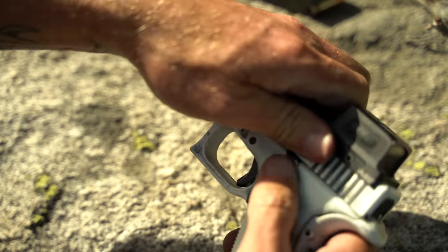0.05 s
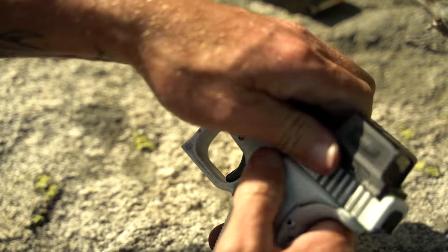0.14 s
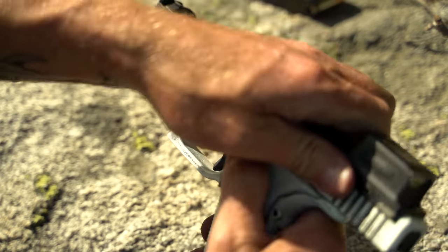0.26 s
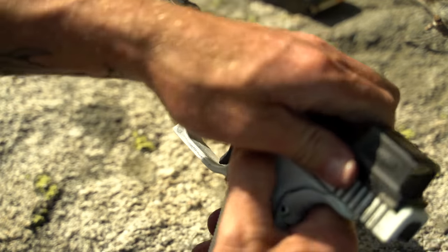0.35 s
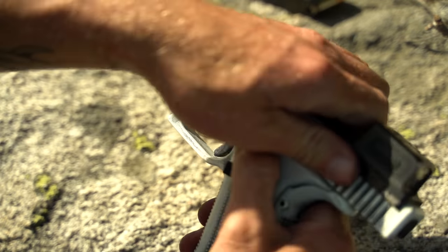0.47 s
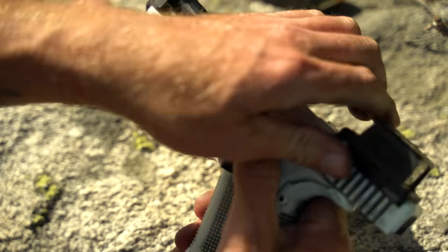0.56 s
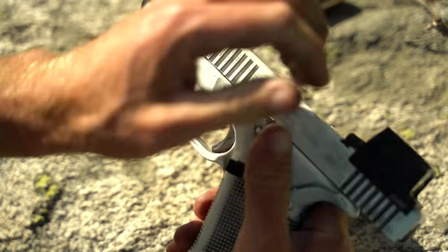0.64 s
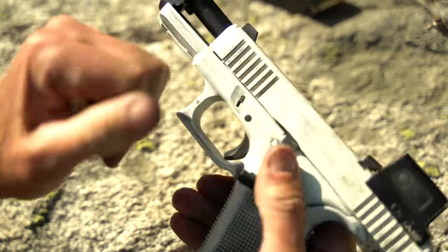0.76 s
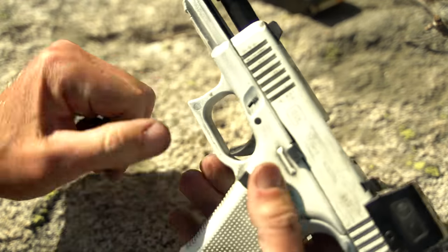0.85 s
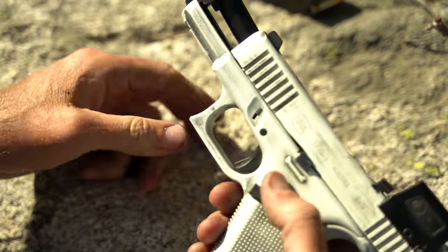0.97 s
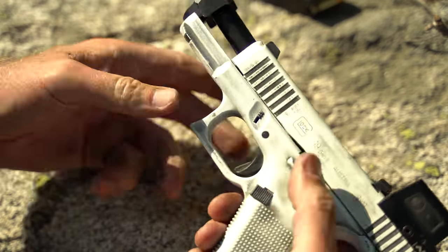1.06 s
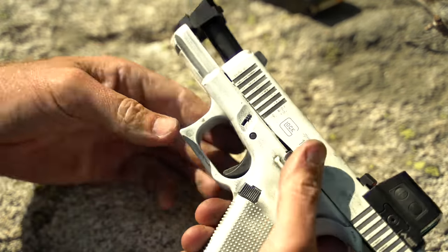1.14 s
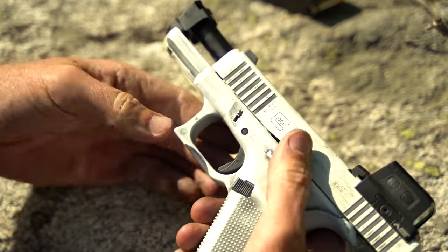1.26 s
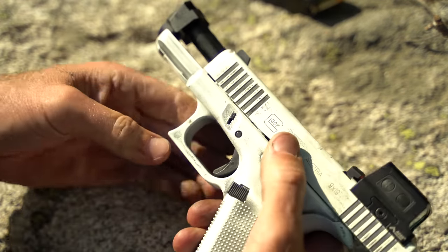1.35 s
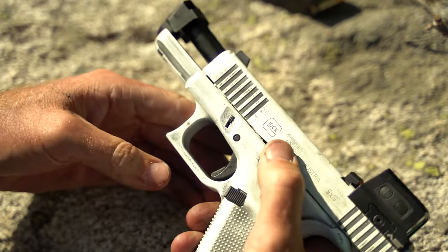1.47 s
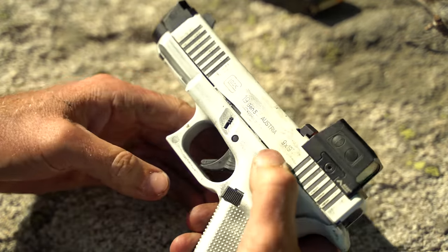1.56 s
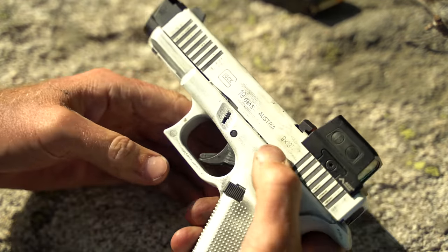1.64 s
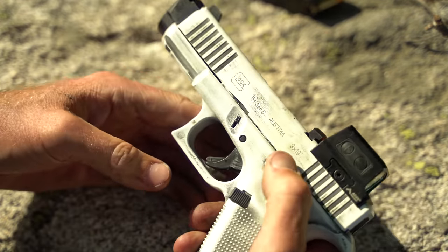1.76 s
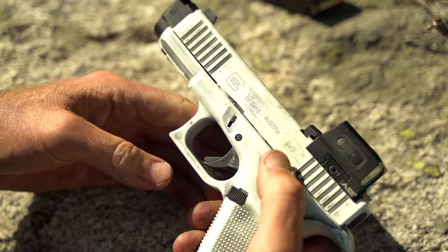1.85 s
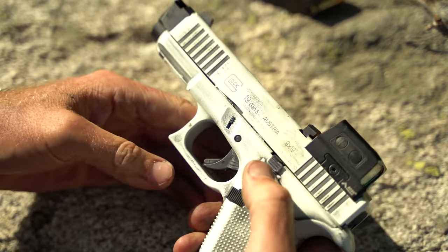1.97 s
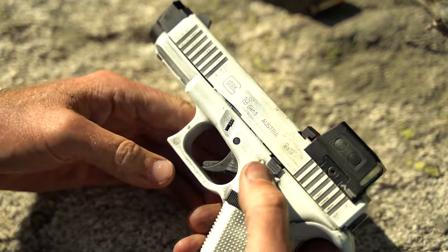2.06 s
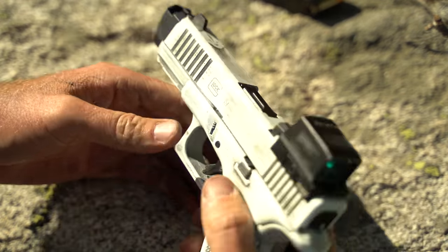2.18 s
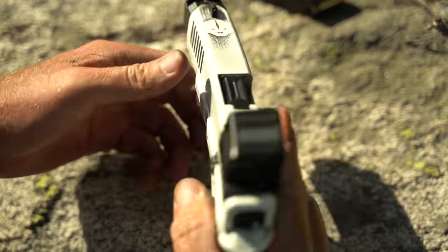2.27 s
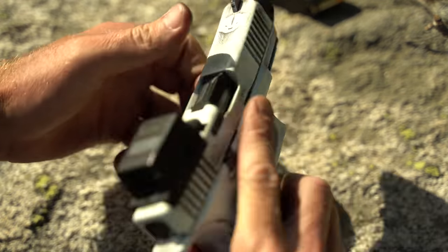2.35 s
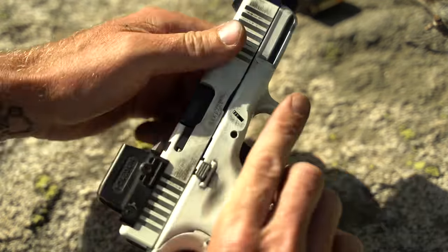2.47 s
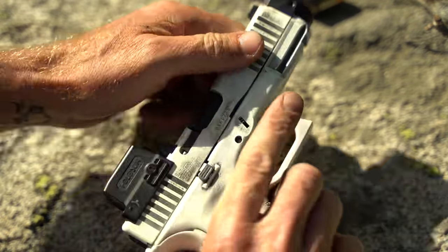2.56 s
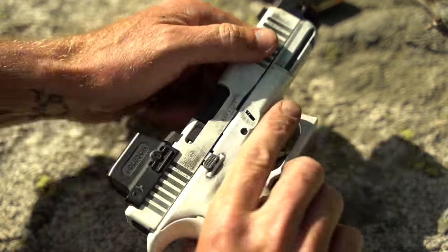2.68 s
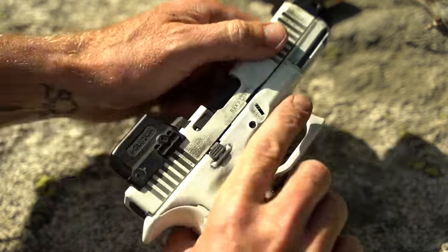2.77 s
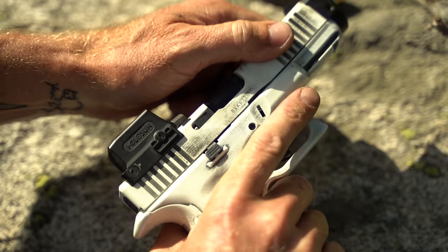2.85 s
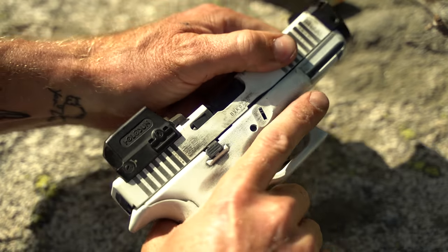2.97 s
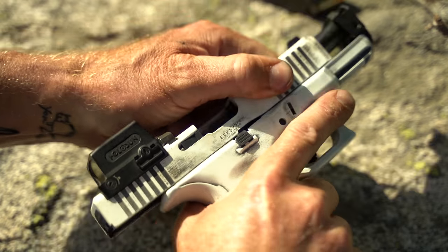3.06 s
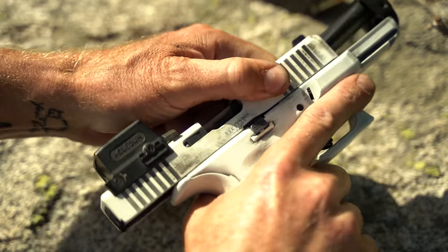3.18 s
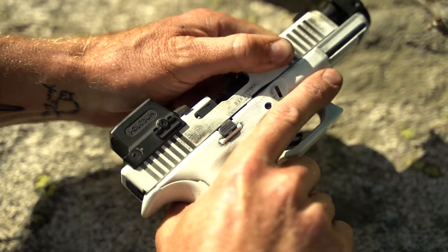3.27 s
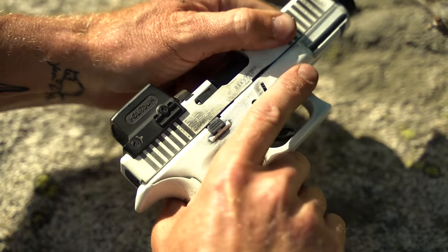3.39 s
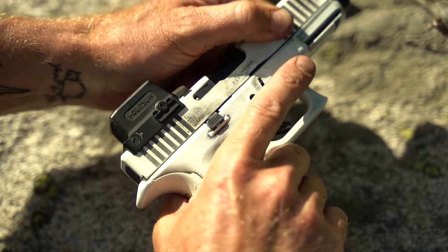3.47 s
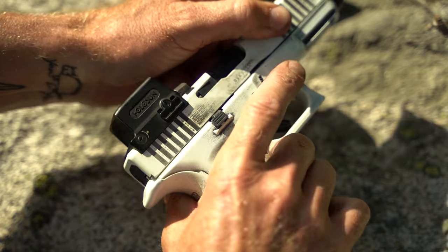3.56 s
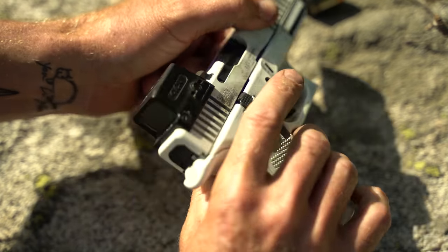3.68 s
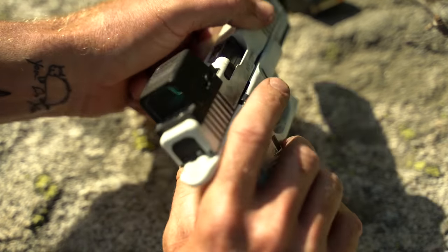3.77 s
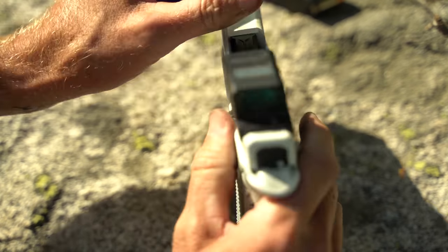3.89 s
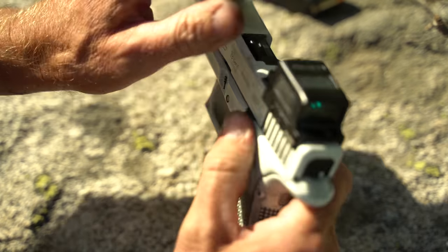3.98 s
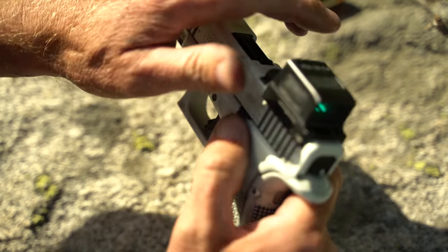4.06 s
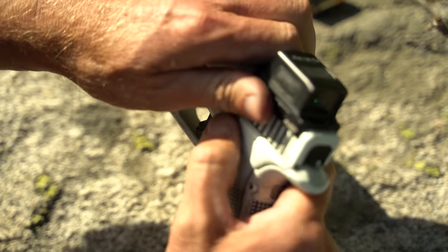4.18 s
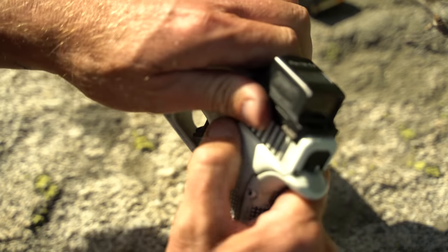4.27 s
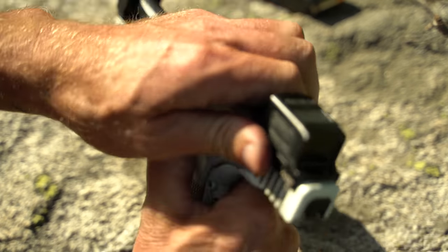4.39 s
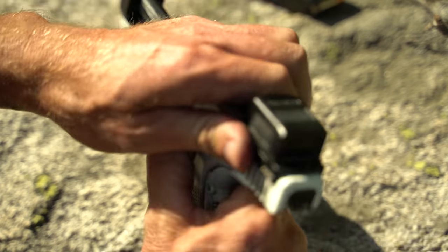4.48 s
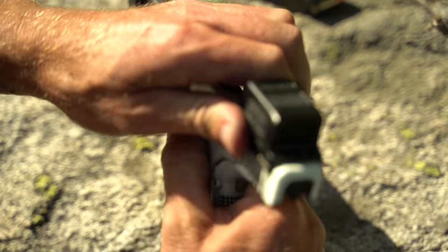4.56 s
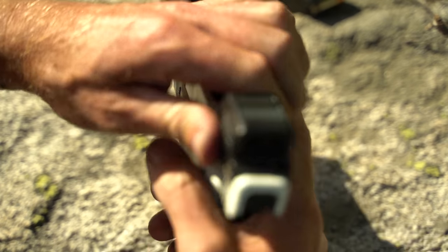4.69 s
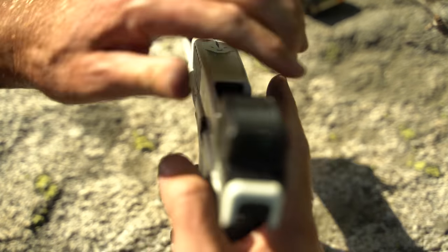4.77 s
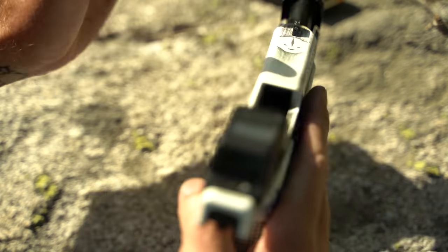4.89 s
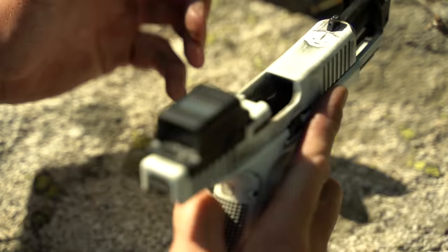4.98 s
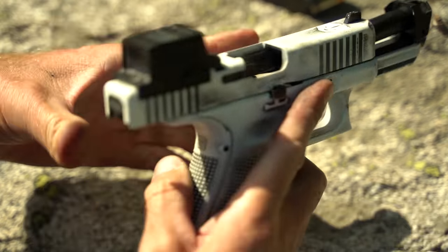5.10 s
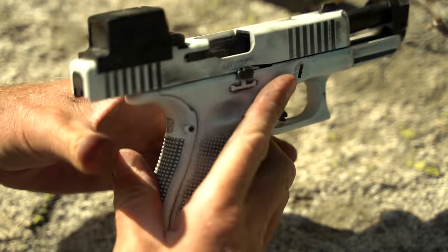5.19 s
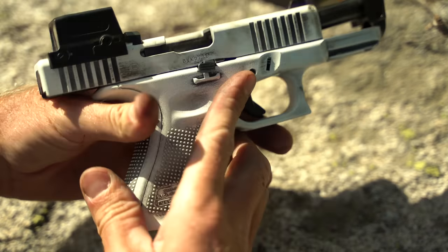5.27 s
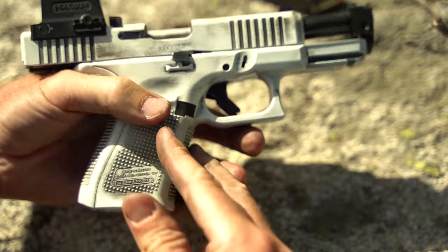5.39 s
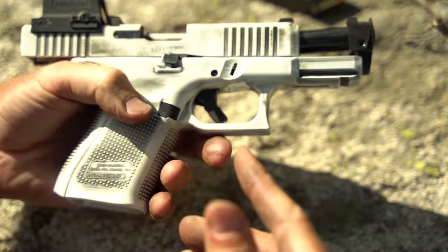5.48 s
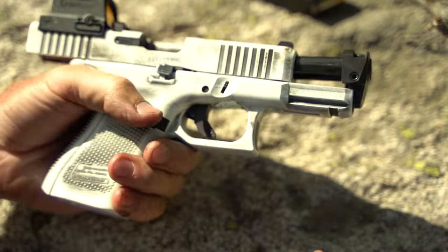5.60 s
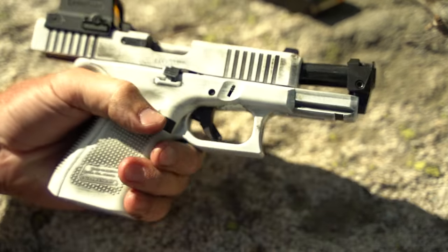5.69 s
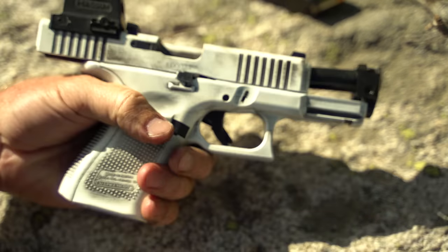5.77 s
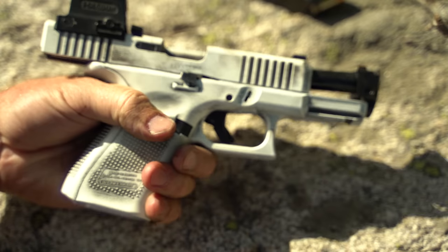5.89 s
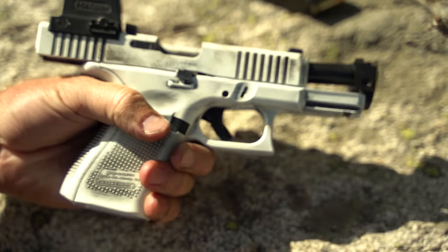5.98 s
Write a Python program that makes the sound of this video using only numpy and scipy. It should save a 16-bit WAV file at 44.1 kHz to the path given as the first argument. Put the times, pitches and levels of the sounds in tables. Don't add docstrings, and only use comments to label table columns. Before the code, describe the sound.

A pistol's steel slide is racked, slammed and locked back by hand outdoors, with gritty scrapes, sharp metallic clacks and small ticks between.

```python
import sys
import numpy as np
from scipy import signal
from scipy.fft import rfft, irfft, next_fast_len
from scipy.io import wavfile

SR = 44100
rng = np.random.default_rng(int(sys.argv[2]) if len(sys.argv) > 2 else 0)


def nominal_scale(level):
    x = np.asarray(level, float) / 20
    return 10 ** x


def put_to_file(sound):
    columns = np.atleast_2d(sound).T
    safe = np.clip(columns, -1, 1)
    whole_steps = np.round(safe * 32767)
    wavfile.write(sys.argv[1], SR, whole_steps.astype(np.int16))


N = 266364
LEFT_RIGHT = np.array([[1], [-1]])

# (frequency [Hz], level [dB], t60 [s])
FRAME_MODES = [(323, -16, 0.029), (417, -17, 0.013), (605, -0.5, .015), (710, 1, 0.022), (937, 0, 0.018),
               (1085, 4, 0.015)]
# (frequency [Hz], level [dB], t60 [s])
SLIDE_MODES = [(1320, 0.5, .018), (1620, -11, 0.0043), (1880, 2, .022), (2010, 0, 0.014), (2238, 2, 0.019),
               (2501, 0, .016), (2887, -1, .018), (3297, 3.5, .012)]
# (frequency [Hz], level [dB], t60 [s])
PART_MODES = [(4094, 5.5, 0.0065), (4800, -4.5, .008), (5310, -4, 0.01), (5830, -2.5, .011),
              (6730, 0, 0.0031), (7437, -2, 0.0064), (8750, -3, 0.0028), (9580, -5.5, 0.0094),
              (10900, -10, 0.0029), (13800, -14.5, .005), (14820, -19, .005)]
# (frequency [Hz], likeness [-1 to 1])
AIR_LIKENESS = [(60, .85), (250, .93), (700, .9), (1400, .5), (3000, -.1)]


def rms_one(x):
    return x / np.sqrt(np.mean(x ** 2) + 1e-20)


def in_time(rows):
    s, *columns = np.transpose(rows)
    return [np.interp(np.arange(N) / SR, s, c) for c in columns]


def at_hz(points, hz, order=1):
    return np.interp(np.log(hz), np.log(np.array(points)[:, 0]), np.array(points)[:, order])


def filtered(x, order, hz, kind):
    return signal.sosfilt(signal.butter(order, hz, kind, fs=SR, output="sos"), x)


def drift(rate_hz):
    r = np.exp(-80 * np.pi * rate_hz / SR)
    slow = signal.lfilter([1], [1, -2 * r, r * r], rng.standard_normal(N // 40 + 2002))[2000:]
    return np.interp(np.arange(N) / 40, np.arange(len(slow)), rms_one(slow))


def bands(spectrum, patchy_db, likeness, size=2):
    out, edges = 0, 22 * 2 ** np.arange(0, 10, .5)
    white = rng.standard_normal((size, 2, N))
    for k, (low, high) in enumerate(zip(edges, edges[1:])):
        hz = np.sqrt(low * high)
        if not spectrum[0][0] * .8 < hz < spectrum[-1][0]:
            continue
        mid, side = filtered(white[k % size], 2, [low, high], "band")
        alike = np.clip(at_hz(likeness, hz), -1, 1)
        gain = nominal_scale(at_hz(spectrum, hz) + patchy_db * drift(3))
        out = out + gain * (np.sqrt(1 + alike) * mid + np.sqrt(1 - alike) * side * LEFT_RIGHT)
    return rms_one(out)


def body(modes, crack_db, size=2048):
    t = np.arange(size) / SR
    rings = 0
    for k, (hz, db, t60) in enumerate(modes):
        rings = rings + nominal_scale(db - 60 * t / abs(t60)) * np.sin(2 * np.pi * hz * t) * (-1) ** k
    crack = filtered(t == 0, 2, [modes[0][0] * 0.86, min(modes[-1][0] * 0.93, 11000)], "band")
    return rms_one(rms_one(rings) + nominal_scale(crack_db) * rms_one(crack))


def near(modes, hz, fall_db, most_db, damping=1.0):
    return [(f, db - min(fall_db * np.log2(f / hz) ** 2, most_db), t60 / damping) for f, db, t60 in modes]


def ports(x, direction):
    size = next_fast_len(N + 4096)
    hz = np.maximum(np.fft.rfftfreq(size, 1 / SR), 1)
    gap = nominal_scale(at_hz(direction, hz, order=2) / 2) * np.exp(.5j * at_hz(direction, hz))
    return irfft(rfft(x, size) * [gap, 1 / gap], size)[:, :N]


def breeze():
    # (time [s], level [dB])
    gusts = [(0.0, -64), (0.27, -65), (2.24, -71.5), (3.11, -66.5), (3.25, -60.5), (3.62, -71), (4.16, -69),
             (4.56, -62.5), (5.26, -73.5), (6.04, -72)]
    return in_time(gusts)[0]


def drone():
    # (peak time [s], half length [s], rise above rest [dB])
    swells = [
        (2.45, .35, 7.5),
        (3.62, 0.37, 10),
        (5.72, 0.37, 13.5),
    ]
    centre_hz, width_hz, rest_db = 370, 90, -78
    r = np.exp(-np.pi * width_hz / SR)
    poles = [1, -2 * r * np.cos(2 * np.pi * centre_hz / SR), r * r]
    once = signal.lfilter([1, 0, -1], poles, rng.standard_normal((2, N)))
    mid, side = signal.lfilter([1, 0, -1], poles, once)
    db = rest_db + sum(in_time([(s - half, 0), (s, rise), (s + half, 0)])[0] for s, half, rise in swells)
    return nominal_scale(db) * rms_one(mid + 0.24 * side * LEFT_RIGHT)


def far_hum(breeze_db):
    # (frequency [Hz], density [dB per Hz])
    spectrum = [(76, -32.5), (130, -8.5), (340, -15), (381, -2.5), (479, -19), (780, -10.5), (1050, -20.5),
                (2700, -27), (5200, -64.5), (8800, -120)]
    hum_db = -68 + .35 * (breeze_db - breeze_db.mean())
    return nominal_scale(hum_db) * bands(spectrum, .8, AIR_LIKENESS) + drone()


def wind(breeze_db):
    # (frequency [Hz], density [dB per Hz])
    spectrum = [(12, -32), (20, 0.5), (59, -5.5), (92, 0), (140, -20.5), (220, -15), (290, -38),
                (480, -120)]
    return nominal_scale(breeze_db + 2.0) * bands(spectrum, 0.96, AIR_LIKENESS)


def microphone_hiss():
    # (frequency [Hz], density [dB per Hz])
    spectrum = [(2000, -13), (3000, 0), (4500, 0), (7000, -1.5), (10000, -5), (13000, -5), (16000, -9.5)]
    return nominal_scale(-77.5) * bands(spectrum, .4, [(1000, .05), (9000, .05)])


def travel():
    # (start [s], speed-up [s], run [s], scrape level [dB], bright part re scrape [dB])
    racks = [(0.226, .026, .01, -42, -6), (0.265, 0.02, .008, -42.5, -3), (0.295, 0.011, 0.013, -37.5, -8),
             (0.325, .015, 0.0095, -57.5, -8), (0.452, 0.033, 0.04, -46.5, -9.5),
             (1.629, .006, .005, -29.5, -2), (1.655, 0.0064, 0.0088, -43, 0), (1.67, .01, 0.02, -57, 1),
             (4.405, .068, 0.025, -40, -9), (4.488, .018, .022, -36, -6), (4.535, .01, 0.013, -51, -14),
             (4.604, .032, 0.0215, -41, -7.5), (5.33, 0.063, 0.047, -66, -8.5), (5.45, .03, .07, -71.5, -6),
             (0.596, .006, .008, -71.5, -10), (0.13, .03, .02, -71, -11.5), (5.63, .02, 0.043, -72, -2.5),
             (1.07, .03, .065, -74, -10)]
    # (start [s], speed-up [s], run [s], scrape level [dB], bright part re scrape [dB])
    easings = [
        (3.05, .03, .004, -61, -5.5),
        (3.1, 0.028, 0.014, -44.5, -7.5),
        (3.135, 0.02, 0.072, -46, -5),
        (3.315, 0.043, .042, -46, -7),
        (3.385, .006, .008, -56, 5.5),
        (3.396, .008, .022, -44, 1),
        (3.43, .01, .02, -73, -2),
    ]
    speed_up_db, run_out_db_per_s = 26, 1100
    gains = np.zeros((3, N))
    for rows, frame_db in ((racks, -12), (easings, -2)):
        for s, rise, run, db, bright_db in rows:
            at = round(s * SR)
            t = np.arange(min(N - at, SR // 4)) / SR
            lost_db = speed_up_db * np.clip(1 - t / rise, 0, 1)
            lost_db = lost_db + run_out_db_per_s * np.maximum(t - rise - run, 0)
            gain = nominal_scale(db - lost_db) * np.minimum(t / .004, 1)
            gains[:, at:at + len(t)] += gain * nominal_scale([[0], [bright_db - 3.0], [frame_db]])
    return gains


def scrape(per_s=7000, uneven_db=3.5, apart=0.82):
    grains = rng.random((2, N)) < per_s / SR
    sizes = nominal_scale(uneven_db * np.minimum(rng.exponential(1, (2, N)), 3))
    grit = grains * sizes * rng.choice([-1, 1], (2, N)) * nominal_scale(3 * drift(60))

    def shaken(modes):
        return rms_one(signal.fftconvolve(grit, body(modes, -6.0)[None], axes=1)[:, :N])

    frame = shaken(FRAME_MODES[3:] + SLIDE_MODES[:1])
    slide = shaken(near(SLIDE_MODES, 2250, 35.0, 8.0, 1.5))
    bright = shaken(near(PART_MODES, 5400, 9.1, 14.0))
    bright = bright[0] + apart * bright[1] * LEFT_RIGHT
    slide_gain, bright_gain, frame_gain = travel()
    return slide_gain * slide[0] + frame_gain * frame[0] + bright_gain * bright


def contacts():
    # (time [s], peak [dB], frame knock re peak [dB], bright crack re peak [dB], struck spot pitch [Hz])
    stops = [(0.241, -14, -14, -5, 2950), (0.245, -21, -10, -6, 1900), (0.273, -19, -14, -4, 2700),
             (0.2975, -24, -26, -8, 2000), (0.306, -27, -2.5, -9.5, 2330), (0.311, -23, -10, -9.5, 2060),
             (0.315, -25, -10, -9, 1900), (0.493, -10, -4, -7, 2600), (1.625, -12, -8, -1, 2600),
             (1.63, -17, -8, -1, 2900), (1.643, -15.5, -9, -0.5, 2576), (1.644, -3, -12.5, 5, 2600),
             (1.65, -9, -12, 2, 1500), (3.2075, -20, 1, -3, 1340), (3.408, -14, -8.5, 4, 2700),
             (3.423, -21, -18, -4, 1900), (4.46, -20, -10, 3.5, 1900), (4.502, -25.5, -13, 3.5, 2400),
             (4.516, -11.5, -12, -8, 1950), (4.6265, -16, -5, -5, 1900), (4.631, -17, -24, -5.5, 2207)]
    # (time [s], peak [dB], bright crack re peak [dB], pitch [Hz])
    clamped = [(0.259, -45.5, -5.5, 1950), (0.285, -37.5, -1.5, 2500), (0.345, -39, -16, 2080),
               (0.515, -26, -11, 2000), (0.55, -54, -15, 2000), (4.412, -55.5, -2, 1400),
               (4.439, -33.5, -2, 2400), (4.448, -42, 3, 2200), (4.454, -28.5, 4, 1970),
               (4.512, -28, -10, 2200), (4.529, -29.5, -7, 2160), (4.543, -30.5, -17, 1990),
               (4.645, -35, -12, 1900), (4.657, -36, -12, 2100)]
    # (time [s], peak [dB], bright crack re peak [dB],
    # pitch [Hz])
    pinched = [(1.617, -54, -12, 2396), (1.669, -33, -6, 1400), (3.085, -40.5, -9, 2044),
               (3.103, -38, -5, 2197), (3.108, -46, 8, 2500), (3.114, -30, -4, 1400),
               (3.123, -25.5, 1.5, 1340), (3.129, -34, -15, 1340), (3.178, -39, -15, 1340),
               (3.188, -35, 9, 2350), (3.198, -40, -15, 1340), (3.217, -37, -8, 2250),
               (3.248, -41, -12, 1416), (3.297, -48, -10, 2880), (3.313, -47, -10, 2300),
               (3.354, -40, 4, 2295), (3.358, -42, 5, 2500), (3.377, -29, -9, 1340),
               (3.402, -36, 6.5, 2320), (3.486, -49.5, -11, 1380)]
    # (time [s], peak [dB], bright crack re peak [dB], pitch [Hz])
    ticks = [(0.952, -42.5, -14, 2500), (0.958, -42, -15, 1790), (1.173, -62, -15, 1340),
             (1.201, -55.5, 0.5, 2900), (1.238, -59, -12.5, 2720), (1.276, -52, -19.5, 1383),
             (2.202, -51, -1.5, 1620), (2.875, -64, -9.5, 2070), (2.92, -66.5, -6, 2250),
             (3.645, -61.5, -0.5, 1800), (3.685, -55, -16, 2138), (4.04, -64, -10, 2292),
             (4.845, -58, -8, 2210), (5.354, -44, -18, 2154), (5.379, -29, -13.5, 2260),
             (5.435, -57, -7, 2152), (5.539, -57.5, -10.5, 2280), (5.627, -45, -10, 2124),
             (5.636, -48, -8, 2202), (5.754, -52.5, -10, 2246), (5.844, -48, -3, 2900),
             (5.8475, -45, 0, 1700), (5.954, -55.5, -15, 1434)]
    # (rows, knock dB, usual peak dB)
    held = [(clamped, -15.5, -35), (pinched, -4.5, -40), (ticks, -4.5, -52)]
    light = []
    for rows, knock_db, usual_db in held:
        for s, db, crack_db, hz in rows:
            light.append((s, db, knock_db - 0.33 * (db - usual_db), crack_db, hz))
    return sorted(list(stops) + light)


def hits(apart=.8, linger=1.4):
    # (start [s], loudest frame mode [Hz])
    holds = [
        (0.0, 900),
        (0.9, 980),
        (4.0, 560),
        (5.0, 900),
    ]
    out, t = np.zeros((2, N + 4096)), np.arange(2048) / SR
    frames = [filtered(body(near(FRAME_MODES, hz, 8.0, 9.0), -5.0), 2, 393, "high") for since, hz in holds]
    rows = contacts()
    draws = rng.standard_normal((len(rows), 4, len(t))) * np.minimum(1, (t + 1 / SR) / 0.00032)
    for (s, db, knock_db, crack_db, spot_hz), draw in zip(rows, draws):
        t60 = .012 + .0004 * max(db + 24, 0)
        burst = draw[:2] * nominal_scale(-60 * t / max(t60, .002))
        burst[:, 8] = 3.6 * np.sqrt([30, 5])
        loose = draw[2:] * nominal_scale(-60 * t / max(linger * t60, .002))
        frame_shake, slide_shake = burst[:, None] + .55 * loose[:, None] * LEFT_RIGHT
        bright_shake = loose[0] + apart * loose[1] * LEFT_RIGHT

        is_free = 0.9 < s < 4.0
        light = np.clip(-db / 32, .3, 1.5)
        if not is_free:
            light = min(light + .3, max(light, 1))
        damping = 1.3 if is_free else 1.6
        frame = frames[sum(s >= since for since, hz in holds) - 1]
        slide = body(near(SLIDE_MODES, spot_hz, 200.0 * light ** 2, 11.0 * light, damping), -8.0 * light)
        edge_hz = np.clip(7599.5 + 170 * crack_db, 4500, 9000)
        small = body(near(PART_MODES, edge_hz, 9.0, 14.0), -4.5)
        small = filtered(small, 2, min(2.3 * edge_hz, 18000), "low")

        sound = 0
        for part, shake, level_db in ((frame, frame_shake, knock_db + 2.0), (slide, slide_shake, 2.1),
                                      (small, bright_shake, crack_db + 4.0)):
            rung = signal.fftconvolve(shake, part[None], axes=1)
            sound = sound + nominal_scale(db + level_db) * rung / np.abs(rung).max()
        at = round((s - .0004) * SR)
        out[:, at:at + sound.shape[1]] += sound
    return out[:, :N]


def pings():
    # (time [s], peak [dB], frequency [Hz], t60 [s])
    flicked = [(0.324, -55, 6100, .06), (1.003, -56, 4900, .01), (1.013, -64, 5000, .008),
               (1.644, -14, 7480, .025), (1.644, -14, 5860, .028), (1.646, -18, 4040, .06),
               (1.646, -28, 4770, .07), (1.646, -27, 6480, .06), (3.21, -46, 11700, .03),
               (3.228, -52, 6100, .06), (3.408, -20, 6250, .012), (3.409, -23, 14500, .015),
               (4.627, -46, 14500, .02), (5.379, -48, 7000, .01), (5.844, -42, 4200, .008),
               (5.844, -47, 3100, .006), (5.8475, -39, 4600, .016)]
    # (time [s], peak [dB], frequency [Hz], t60 [s])
    knells = [(0.241, -24, 10200, .012), (0.273, -28, 1180, .02), (0.274, -27, 10000, .01),
              (0.2975, -23, 1980, .018), (0.494, -17, 1950, .018), (0.494, -22, 1200, .02),
              (1.626, -25, 600, .025), (3.115, -38, 620, .025), (3.188, -36, 4300, .01),
              (3.208, -21, 1200, .02), (3.208, -34, 14000, .01), (3.408, -21, 1110, .025),
              (3.423, -21, 1890, .025), (3.425, -36, 1880, .12), (4.461, -22, 1900, .022),
              (4.461, -30, 1150, .02), (4.627, -22, 1900, .022), (5.379, -48, 950, .02)]
    out, t = np.zeros(N + 4096), np.arange(4096) / SR
    for s, db, hz, t60 in list(flicked) + list(knells):
        at = round(s * SR)
        swell = nominal_scale(db - 60 * t / abs(t60)) * np.minimum(t / .001, 1)
        out[at:at + len(t)] += swell * np.sin(2 * np.pi * hz * t)
    return out[:N]


def jolts():
    # (time [s], peak [dB], t60 [s])
    pushes = [
        (0.292, -40, 0.42),
        (0.494, -48.5, 0.12),
        (1.645, -34, 0.069),
        (3.12, -50, 0.15),
        (3.208, -44.5, 0.092),
        (3.409, -60, 0.12),
        (4.46, -51, 0.13),
        (4.515, -37.5, 0.091),
        (4.628, -47.5, 0.12),
    ]
    out, t = np.zeros(N + 16384), np.arange(16384) / SR
    for (s, db, t60), draw in zip(pushes, rng.standard_normal((len(pushes), len(t)))):
        push = filtered(draw * nominal_scale(-60 * t / max(t60, .02)), 3, [25, 105], "band")
        at = round(s * SR)
        out[at:at + len(t)] += nominal_scale(db + 1.5) * push / np.abs(push).max()
    return out[:N] * nominal_scale([[2.5], [-3.5]])


def grip():
    # (frequency [Hz], level [dB], t60 [s])
    hollow = [(328, -1.5, 0.039), (582, -4, 0.032), (810, -7.5, .035), (890, -7, 0.028),
              (1160, -12.5, 0.015)]
    # (time [s], peak [dB])
    taps = [(0.311, -33.5), (0.495, -36), (1.626, -28), (1.646, -19.5), (4.461, -38), (4.517, -24),
            (4.627, -27), (4.673, -50), (5.842, -33), (5.8472, -34)]
    clicks = np.zeros(N)
    clicks[[round(s * SR) for s, db in taps]] = nominal_scale(np.array(taps)[:, 1])
    ring = body(hollow, -12.0, size=4096)
    return signal.fftconvolve(clicks, ring / np.abs(ring).max())[:N]


def scatter(x, size=8192):
    # (frequency [Hz], t60 [s])
    decay = [(300, 0.07), (1500, 0.16), (5000, 0.135), (14000, 0.03)]
    t, tail = np.arange(size) / SR, 0
    white = rng.standard_normal((2, size)) * np.clip((t - .003) / 0.0034, 0, 1)
    for low in 500 * 2.0 ** np.arange(5):
        octave = filtered(white, 2, [low, 2 * low], "band")
        tail = tail + octave * nominal_scale(-60 * t / abs(at_hz(decay, low * np.sqrt(2))))
    return nominal_scale(-31) * signal.fftconvolve(x, rms_one(tail) / np.sqrt(size), axes=1)[:, :N]


def alike_in_bass(x):
    mid, side = (x[0] + x[1]) / 2, (x[0] - x[1]) / 2
    side = signal.sosfiltfilt(signal.butter(4, 1150, "high", fs=SR, output="sos"), side)
    return mid + side * LEFT_RIGHT


def pistol():
    # (frequency [Hz], left lead [rad], left minus right [dB])
    direction = [(300, 0, 0), (1900, -0.1, -0.5), (2600, -0.7, -2.5), (3100, -1.5, -2), (3600, -2.6, 0),
                 (4600, -2.3, 3), (6200, -1.3, 3), (9000, 0, 1.5)]
    steel = scrape() + hits() + pings() + grip()
    return alike_in_bass(ports(steel, direction) + scatter(steel))


def rustle():
    # (start [s], fastest [s], end [s], sleeve level [dB], palm re sleeve [dB])
    brushes = [
        (0.83, 0.88, 1.22, -72.5, 1),
        (2.45, 2.55, 2.84, -67, -0.5),
        (3.6, 3.868, 4.0, -75.5, -1),
        (4.02, 4.17, 4.33, -67.5, 4.5),
        (4.15, 4.29, 4.34, -73, 0),
        (4.64, 4.69, 4.75, -72, 0),
        (4.74, 4.95, 5.12, -65, 0.5),
        (4.98, 5.16, 5.22, -70, 1),
    ]
    # (frequency [Hz], density [dB per Hz])
    cloth = [(2500, -3), (3200, 2.5), (4200, 6), (6200, 2.5), (9000, -3), (12000, -7.5), (16000, -12)]
    # (frequency [Hz], density [dB per Hz])
    skin = [(600, -4.5), (1000, -2), (1300, -2.5), (1800, -9), (2200, -5), (2800, -10.5), (3600, -25)]
    # (frequency [Hz], left lead [rad], left minus right [dB])
    arm = [(300, 0, 0), (1200, 0.5, -0.5), (2000, 1.8, -4), (3150, 2.95, 0), (3850, 3.35, 0),
           (5000, 4.3, 6), (7000, 5.5, 5), (11000, 6, 9)]
    t, sleeve_gain, palm_gain = np.arange(N) / SR, 0, 0
    for start, top, end, db, palm_db in brushes:
        away = np.interp(t, [start, top, end], [1, 0, 1])
        gain = nominal_scale(db - 20 * away ** 1.29) * np.minimum(1, 8 * (1 - away))
        sleeve_gain = sleeve_gain + gain
        palm_gain = palm_gain + gain * nominal_scale(palm_db)
    alike = [(3400, .995), (4700, .85), (6000, .6), (8000, .15)]
    sleeve = sleeve_gain * bands(cloth, 1.9, alike)
    palm = palm_gain * bands(skin, 3.5, alike)
    return ports(nominal_scale(4.5) * (sleeve + palm), arm)


def fly():
    # (time [s], wingbeat [Hz], level [dB])
    flight = [
        (5.4, 200, -88),
        (5.5, 198.2, -74),
        (5.68, 202.9, -74),
        (5.8, 193.2, -70),
        (5.92, 192, -75.5),
        (6.04, 189.6, -68),
    ]
    # (multiple, level [dB])
    wings = [(1, -4), (2, 3), (3, -7), (4, -8.5), (5, -5.5), (6, -6.5), (7, -10)]
    hz, db = in_time(flight)
    turn = 2 * np.pi * np.cumsum(hz * (1 + 0.0069 * drift(12.7))) / SR
    buzz = sum(nominal_scale(level_db + 4.55 * drift(5.2)) * np.sin(k * turn) for k, level_db in wings)
    return nominal_scale(db) * buzz * (np.arange(N) > flight[0][0] * SR)


def scene():
    breeze_db = breeze()
    air = far_hum(breeze_db) + wind(breeze_db) + microphone_hiss()
    return air + pistol() + jolts() + rustle() + fly()


def roll_off(x):
    return signal.sosfilt(signal.butter(12, 15950, fs=SR, output="sos"), x)


def record(dry):
    cut = signal.sosfilt(signal.cheby2(10, 30, 15900 * 1.02, fs=SR, output="sos"), dry)
    mix = np.clip(cut, -1, 1)
    return roll_off(mix)


dry = scene()
out = record(dry)
put_to_file(out)
```